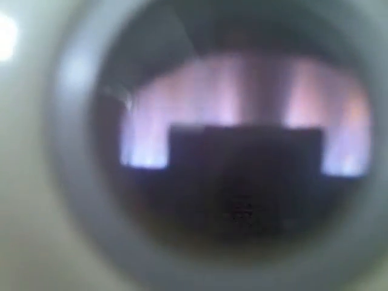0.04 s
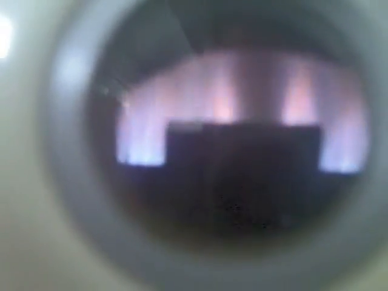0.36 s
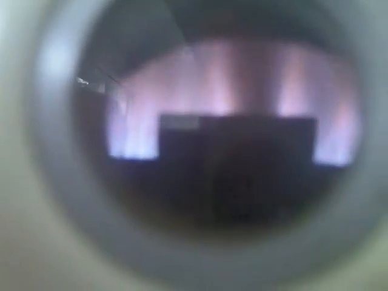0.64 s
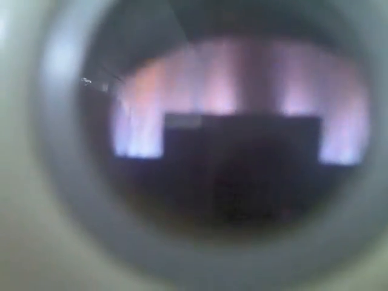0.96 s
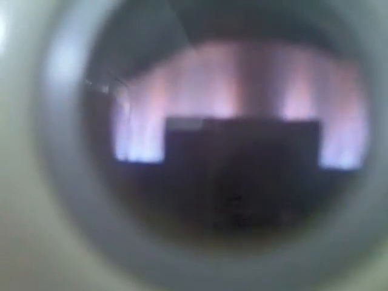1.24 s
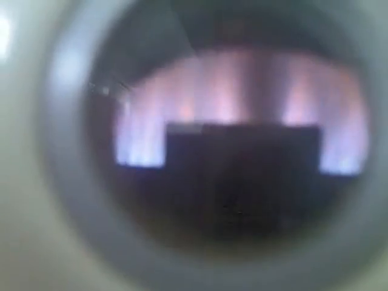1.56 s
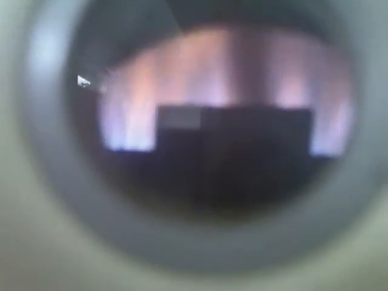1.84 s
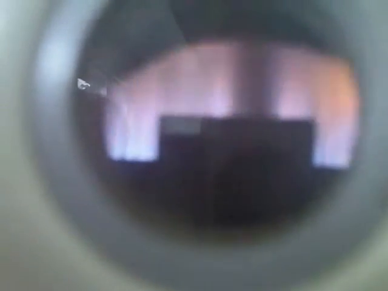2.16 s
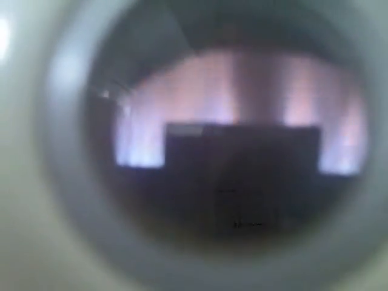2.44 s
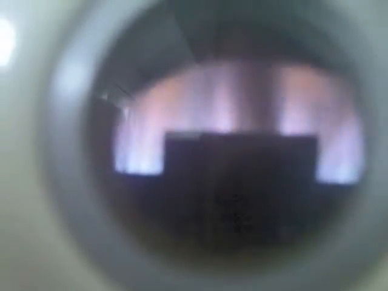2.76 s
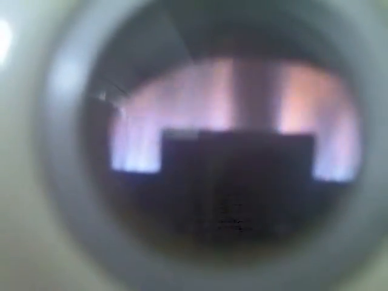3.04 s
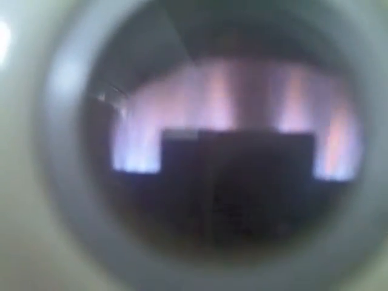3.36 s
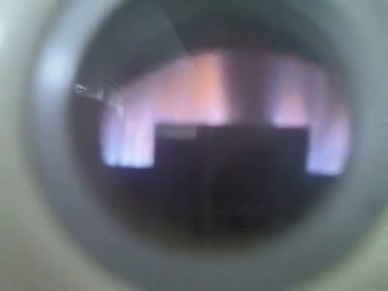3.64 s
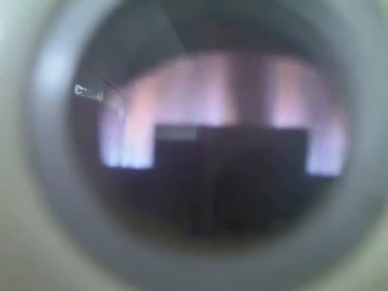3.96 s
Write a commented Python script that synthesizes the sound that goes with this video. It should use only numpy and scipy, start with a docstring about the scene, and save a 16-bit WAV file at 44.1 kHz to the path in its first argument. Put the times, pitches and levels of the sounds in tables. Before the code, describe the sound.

A gas burner flame rushes low and steady, with two sharp clicks near the end.

```python
"""A gas burner heard through its small window. From the start the flame gives a low turbulent rush
and makes the fire chamber boom, over the faint hum and whine of the blower. At 3.1 s something small
and hard clicks dully near the microphone; a few faint ticks follow, the last with a rustle, then a
brighter click at 3.8 s. The burner runs on to the end. The recorder samples coarsely throughout,
which adds a glassy treble."""
import sys
import numpy as np
from scipy import signal
from scipy.fft import rfft, irfft
from scipy.io import wavfile

SR = 44100
rng = np.random.default_rng(int(sys.argv[2]) if len(sys.argv) > 2 else 0)


def generate_wav(signal):
    """Clip the signal to [-1, 1] and save it as 16-bit WAV at the path in sys.argv[1]."""
    frames = np.transpose(np.atleast_2d(signal))
    scaled = np.clip(frames, -1, 1) * 32767
    pcm = np.round(scaled).astype(np.int16)
    wavfile.write(sys.argv[1], SR, pcm)


N = 176400  # 4 s


# spectrum of the flame's rush (frequency [Hz], relative density [dB])
RUSH_SPECTRUM = [(10, -5), (35, -3.5), (55, -1.5), (85, -3), (125, -14.5), (220, -14.5), (290, -12),
                 (400, -17), (520, -15.5), (670, -20), (770, -18.5), (860, -23.5), (1060, -24.5),
                 (1170, -27.5), (1900, -31.5), (2500, -36.5), (5400, -43.5)]
# resonances of the burner housing (frequency [Hz], width [Hz], level [dB])
HOUSING_MODES = [(193.7, 28, -69.5), (442.4, 46, -75), (539.2, 43, -67.5), (602.3, 24, -71),
                 (902.6, 35, -74)]

def flame(rush_db=-53, flicker_db=0.48, flicker_hz=16):
    """Behind the window, a broad flickering rush of turbulence that also rings the housing."""
    hz, db = np.transpose(RUSH_SPECTRUM)
    rush = amp(rush_db) * noise(lambda f: amp(np.interp(np.log(f + 1), np.log(hz), db)))
    housing = sum(amp(level) * ringing(f, width) for f, width, level in HOUSING_MODES)
    return (rush + housing) * amp(flicker_db * drift(flicker_hz))


# resonances of the fire chamber (frequency [Hz], width [Hz], level [dB])
CHAMBER_MODES = [(99, 23, -54), (150.4, 32, -59.5)]
# contour of the boom's surges (time [s], relative level [dB])
BOOM_SURGES = [(0.0, -56), (0.04, -54.5), (0.14, -58), (0.18, -47), (0.65, -60), (0.7, -50), (1.11, -57),
               (1.14, -52.5), (1.66, -52.5), (1.82, -58), (1.89, -51), (2.17, -48.5), (2.32, -58.5),
               (2.37, -46), (2.44, -55.5), (2.67, -52.5), (2.74, -53.5), (2.78, -54.5), (3.23, -51.5),
               (3.29, -67), (3.33, -54), (3.52, -46.5), (3.55, -58.5), (4.0, -52)]

def chamber_boom(surge_depth=0.95, steadiness=0.41):
    """The flame keeps the low resonances of its chamber booming, in uneven surges."""
    times, db = np.transpose(BOOM_SURGES)
    surge = amp(surge_depth * np.interp(np.arange(N) / SR, times, db - db.mean()))
    out = np.zeros(N)
    for hz, width, level in CHAMBER_MODES:
        boom = ringing(hz, width)
        envelope = abs(signal.hilbert(boom)) + 0.22
        steadied = boom / envelope ** steadiness  # partly evens out the random swells
        out += amp(level) * unit(surge * steadied)
    return out


# modes of the small hard part (frequency [Hz], t60 [s], gain when dull [dB], gain when bright [dB])
PART_MODES = [(350, 0.021, -46, -18), (500, 0.022, -34, -6.5), (691, 0.025, -20.5, -17),
              (1214, .012, -21, -3.5), (1500, 0.016, -13, -9), (1820, 0.018, 0.5, -35),
              (2030, 0.011, 1, -11.5), (2296, 0.015, -7, -13), (2780, 0.015, -8, -10.5),
              (3170, 0.024, -19.5, -22), (3520, 0.013, -15, -1.5), (3740, 0.0058, -17, -18),
              (3980, 0.012, -14, -25), (4800, 0.017, -24, -6), (5120, 0.017, -25, -7)]
# modes of the body that carries the part (frequency [Hz], t60 [s], gain [dB])
BODY_MODES = [(643, 0.028, -1.5), (780, 0.017, 1), (1390, 0.021, 0)]

def click(db, brightness, knock_db, snap_db=-5.5, rise_s=0.00023):
    """A hard part snaps and rings briefly, and the body that carries it gives a low knock."""
    t = np.arange(SR // 20) / SR
    ring = np.zeros(len(t))
    for k, (hz, t60, dull_db, bright_db) in enumerate(PART_MODES):
        mode_db = dull_db + brightness * (bright_db - dull_db)
        polarity = (-1) ** (k + 1)
        ring += polarity * amp(mode_db - 60 * t / t60) * np.sin(2 * np.pi * hz * t)
    snap = amp(snap_db) * burst(t, t60=0.017)
    knock = sum(amp(gain - 60 * t / t60) * np.cos(2 * np.pi * hz * t) for hz, t60, gain in BODY_MODES)
    attack = np.minimum(t / rise_s, 1)
    return attack * (amp(db) * (ring + snap) + amp(knock_db) * knock)


# clicks and ticks (time [s], ring and snap gain [dB], brightness [0-1], knock gain [dB])
CLOSE_CLICKS = [(3.1110, -16.5, 0.17, -40.5), (3.1399, -46.5, 0.03, -42), (3.1858, -56, 0.3, -50),
                (3.5014, -60, 0.5, -49), (3.7886, -17.5, 0.84, -40)]

def close_clicks(rustle_s=3.5015, rustle_db=-59):
    """Near the microphone, the part clicks twice and ticks faintly; a rustle goes with one tick."""
    out = np.zeros(N)
    for start_s, db, brightness, knock_db in CLOSE_CLICKS:
        add(out, start_s, click(db, brightness, knock_db))
    rustle = burst(np.arange(SR // 10) / SR, t60=0.15)
    add(out, rustle_s, amp(rustle_db) * rustle)
    return out


# hum and whine of the blower (frequency [Hz], level [dB])
BLOWER_TONES = [(100, -65), (301.5, -68), (902, -78), (920.5, -67.5), (1023, -78)]

def blower(waver_depth=0.0015, waver_hz=5.3):
    """Faint under the flame, motor tones that waver together with the shaft speed."""
    clock = np.cumsum(1 + waver_depth * drift(waver_hz)) / SR
    return sum(amp(db) * np.sqrt(2) * np.sin(2 * np.pi * (hz * clock + rng.random()))
               for hz, db in BLOWER_TONES)


def room(direct, scatter_db=-24.5, t60=0.045):
    """Nearby surfaces send a short, faint scatter to the microphone along with the direct sound."""
    t = np.arange(SR // 4) / SR
    tail = rng.standard_normal(len(t)) * amp(-60 * t / t60)
    scatter = signal.fftconvolve(direct, tail / np.linalg.norm(tail))[:N]
    return direct + amp(scatter_db) * scatter


def amp(db):
    """Decibels to gain."""
    return 10 ** (np.asarray(db) / 20)


def unit(x):
    """Scales to an rms of 1."""
    return x / np.sqrt(np.mean(abs(x) ** 2) + 1e-30)


def noise(shape):
    """Noise of rms 1 whose spectrum follows the gain shape(Hz)."""
    white = rfft(rng.standard_normal(N))
    return unit(irfft(white * shape(np.fft.rfftfreq(N, 1 / SR)), N))


def drift(rate_hz):
    """Slow random motion up to a rate."""
    return noise(lambda f: 1 / (1 + (f / rate_hz) ** 4))


def ringing(hz, width):
    """Turbulence heard through one steep-sided resonance."""
    return noise(lambda f: 1 / (1 + (2 * (f - hz) / width) ** 2) ** 2)


def burst(t, t60, low_cut_hz=600):
    """A dying burst of noise without bass."""
    b, a = signal.butter(2, low_cut_hz, "high", fs=SR)
    return signal.lfilter(b, a, amp(-60 * t / t60) * rng.standard_normal(len(t)))


def add(mix, start_s, sound):
    """Adds a sound to the mix at a time."""
    part = mix[round(start_s * SR):][:len(sound)]
    part += sound[:len(part)]


def scene():
    """At one microphone: the burner behind its window, with the clicks close in front."""
    burner = flame() + chamber_boom() + blower()
    return (burner + room(close_clicks()))[None]


def record(dry, hold_samples=4, hiss_db=-72, band_limit_hz=15600):
    """The recorder samples coarsely and holds each value, mirroring the sound into the treble."""
    coarse = signal.resample_poly(dry[0], 1, hold_samples)
    microphone_hiss = amp(hiss_db) * rng.standard_normal(len(coarse))
    held = np.repeat(coarse + microphone_hiss, hold_samples)[:N]
    lowpass = signal.firwin(511, band_limit_hz, window=("kaiser", 9), fs=SR)
    return signal.oaconvolve(held, lowpass, "same")[None]


dry = scene()
out = record(dry)
generate_wav(out)
```